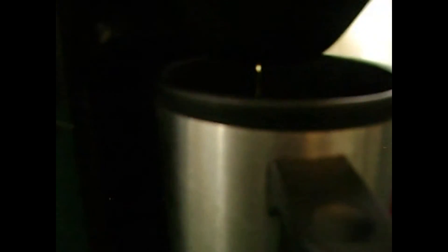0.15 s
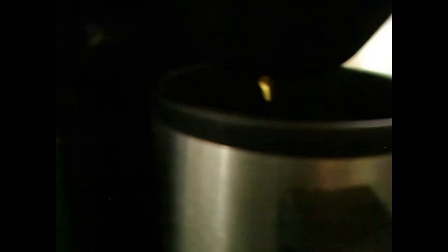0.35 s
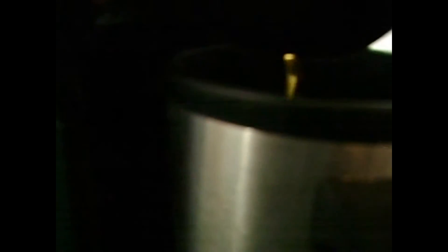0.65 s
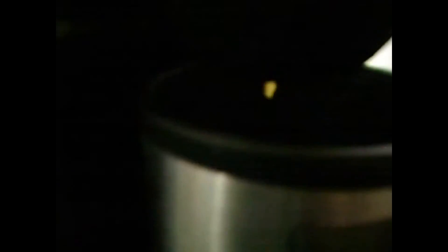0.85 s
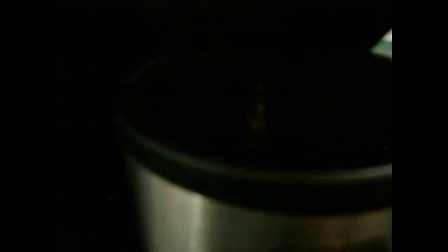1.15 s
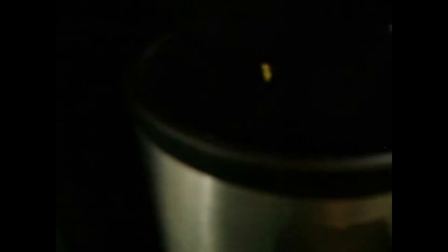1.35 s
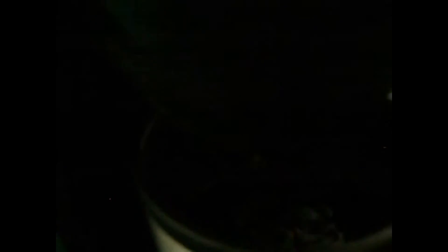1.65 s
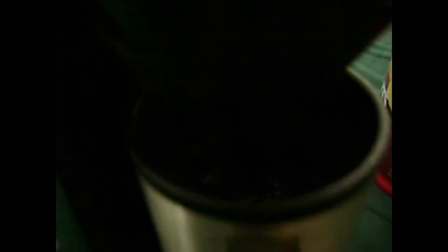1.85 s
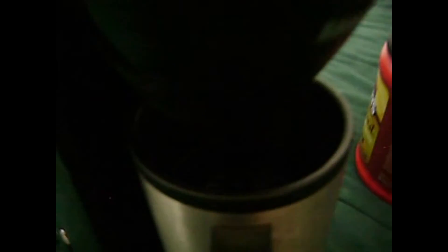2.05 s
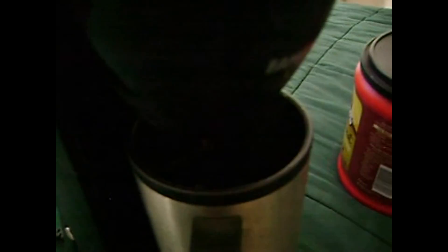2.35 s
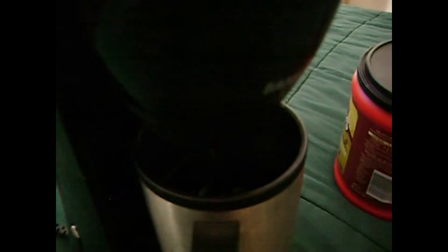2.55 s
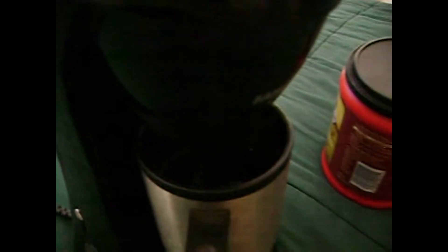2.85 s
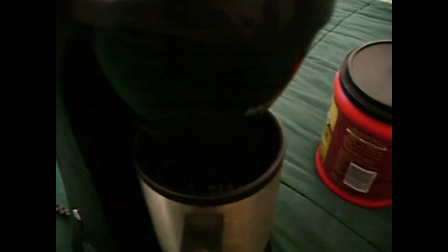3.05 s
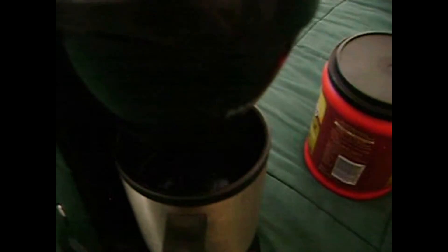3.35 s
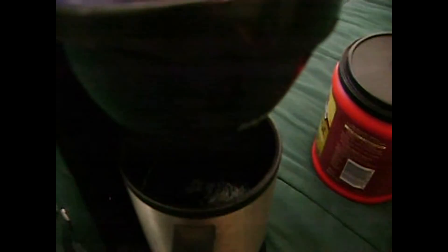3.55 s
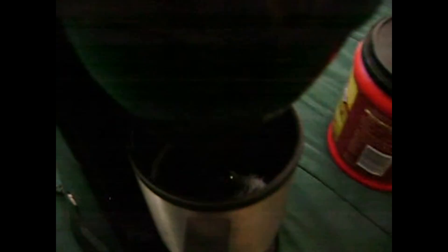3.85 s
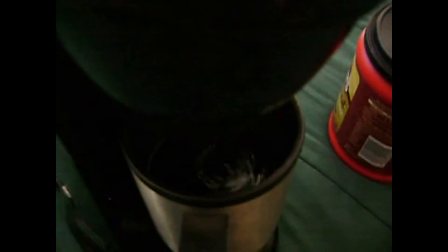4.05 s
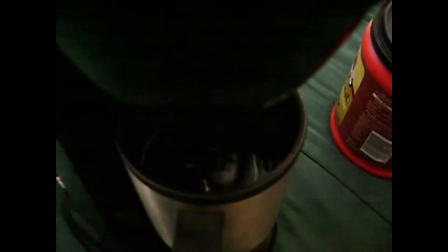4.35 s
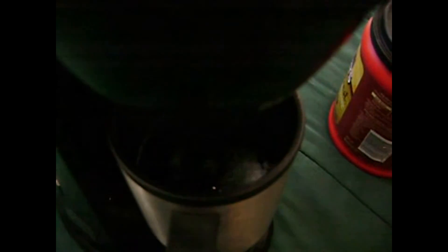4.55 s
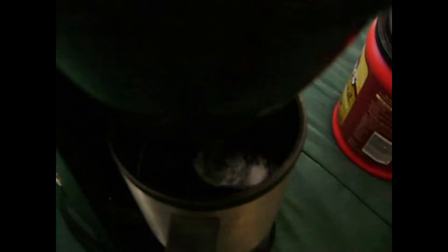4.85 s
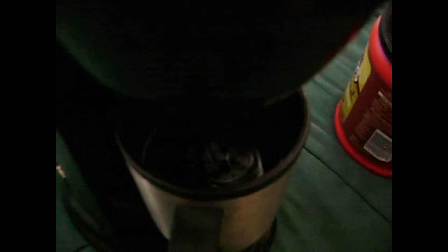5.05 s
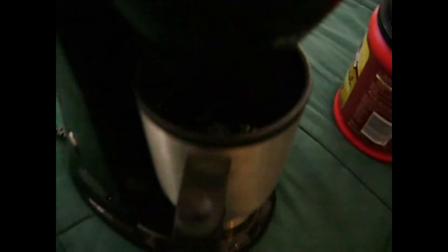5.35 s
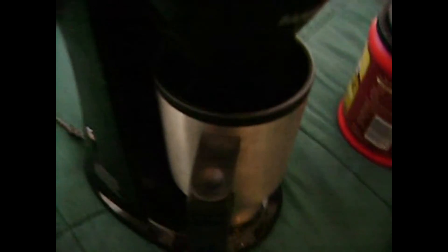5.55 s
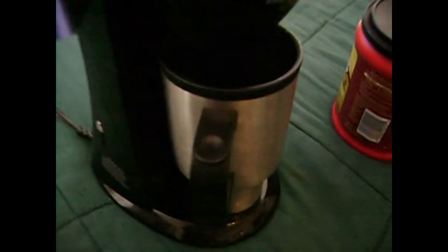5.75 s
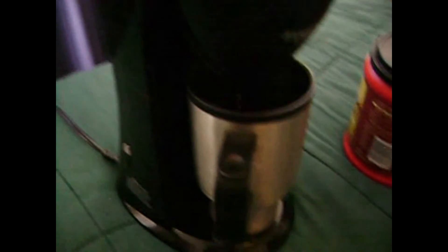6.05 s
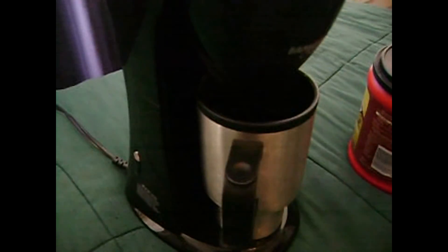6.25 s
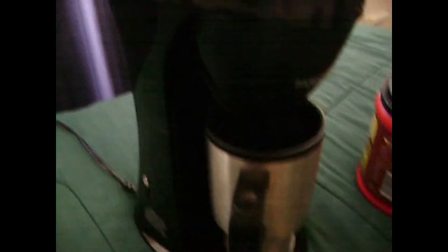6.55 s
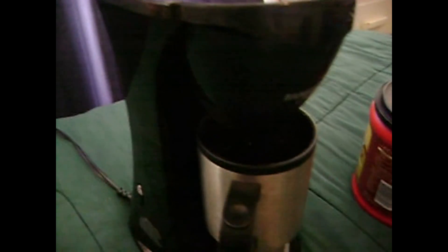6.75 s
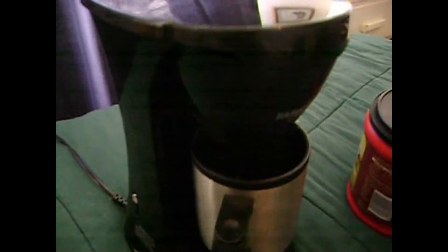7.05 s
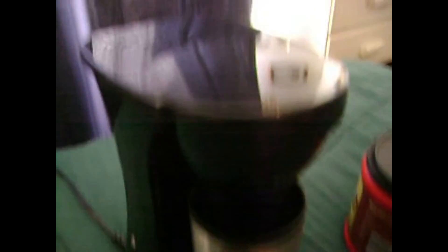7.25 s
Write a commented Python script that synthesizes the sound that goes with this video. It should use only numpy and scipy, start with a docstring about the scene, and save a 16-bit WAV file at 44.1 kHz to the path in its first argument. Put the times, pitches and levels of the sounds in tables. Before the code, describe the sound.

Hard knocking sputters from a coffee machine's basket crowd the first two seconds, with small bubbles and hissing spray between them. They weaken to occasional plops, leaving a faint, unsteady boil. Near the end the steam suddenly comes nearer, with crisp small pops. The sound is close, dull in the treble, gritty and overloaded, with only a short, dry room reflection.

```python
"""Slugs of water and steam pop out of the riser tube of a small drip coffee maker running dry in a bedroom.
Each pop is a double pressure push ringing the filter basket; its spray hisses and rings the lid.
Small bubbles burst between the pops, and three short blasts of steam rasp through the tube as gated noise.
Under them, flickering noise in fixed resonances makes the hum, gurgle, steam and simmer of the boil.
The close, narrow-band microphone kinks and overloads; near the end it rises over the open basket."""
import sys
import numpy as np
from scipy import signal
from scipy.io import wavfile
from scipy.ndimage import uniform_filter1d

SR = 44100
rng = np.random.default_rng(int(sys.argv[2]) if len(sys.argv) > 2 else 0)


def dump_mix(stems):
    """Bounce the given channels to the path in sys.argv[1] as a 16-bit WAV at rate SR."""
    frames = np.atleast_2d(stems).T  # one column per channel
    limited = np.clip(frames, -1, 1)  # hard clip at full scale
    pcm = np.round(limited * 32767).astype(np.int16)
    wavfile.write(sys.argv[1], SR, pcm)


N = 326781  # samples

# microphone path: low beside the mug, then lifted away, finally raised over the open basket
LIFT_START_S, LIFT_LENGTH_S = 0.84, 0.4
OPEN_START_S, OPEN_RISE_S, OPEN_CURVE = 6.74, 0.35, 1.33
OPEN_BOIL_LIFT_DB = 9  # the boil comes closer


def from_db(db):
    """Level definition: decibels to amplitude gain."""
    return 10 ** (np.asarray(db) / 20)


def rms_one(x):
    """Normalisation by effective value: scale to rms 1."""
    return x / np.sqrt(np.mean(x ** 2) + 1e-20)


def in_time(rows):
    """Linear interpolation: each column of a curve at every sample."""
    times, *columns = np.transpose(rows)
    t = np.arange(N) / SR
    return [np.interp(t, times, column) for column in columns]


def drift(rate_hz):
    """Low-passed random process: a slow fluctuation of spread 1."""
    step = 40  # samples between computed points
    pole = np.exp(-2 * np.pi * rate_hz * step / SR)
    settle = 2000  # points dropped while the filter settles
    noise = rng.standard_normal(N // step + settle + 2)
    slow = signal.lfilter([1], [1, -2 * pole, pole * pole], noise)[settle:]
    return np.interp(np.arange(N) / step, np.arange(len(slow)), rms_one(slow))


def resonate(x, modes, order=2):
    """Modal superposition: parallel resonances; order 2 has steeper sides and builds up more slowly."""
    out = 0
    for hz, width_hz, db in modes:
        low = np.hypot(hz, width_hz / 2) - width_hz / 2
        high = min(low + width_hz, SR / 2 - 1)
        band = signal.butter(order, [low, high], "band", fs=SR, output="sos")
        out = out + from_db(db) * signal.sosfilt(band, x + 1e-18)
    return out


def seething(modes, flicker_db, flicker_rate):
    """Random excitation of resonators: countless tiny collapses, in clumps, ring the modes; rms 1."""
    collapses = rng.standard_normal(N) * from_db(flicker_db * drift(flicker_rate))
    return rms_one(resonate(collapses, modes))


def add(track, s, sound):
    """Linear superposition: mix a sound into a track at a time."""
    start = max(round(s * SR), 0)
    track[start:start + len(sound)] += sound[:max(N - start, 0)]


def beside_mug(s):
    """Source-receiver position: 1 with the microphone low beside the mug, 0 once lifted away."""
    return 1 - np.clip((s - LIFT_START_S) / LIFT_LENGTH_S, 0, 1)


def openness(s):
    """Direct sound path: how directly the microphone faces the open basket, 0 to 1."""
    return np.clip((s - OPEN_START_S) / OPEN_RISE_S, 0, 1) ** OPEN_CURVE


# flow of steam through the basket before the microphone comes closer: (t/s, level/dB)
STEAM_FLOW = [(0.0, -40), (0.83, -39.5), (1.13, -37.5), (1.34, -30), (1.74, -39.5), (2.25, -44.5),
              (3.43, -51), (4.49, -48), (6.8, -55)]
# vigour of the simmer in the boiler, likewise: (t/s, level/dB)
SIMMER_VIGOUR = [(0.0, -47), (0.93, -51), (1.42, -43.5), (2.27, -48), (3.47, -48), (4.73, -45.5),
                 (5.4, -46), (6.19, -50), (6.8, -50.5)]


def vigour():
    """Source strength and distance: steam flow and simmer as they reach the microphone, in dB."""
    closer_db = OPEN_BOIL_LIFT_DB * openness(np.arange(N) / SR)
    return in_time(STEAM_FLOW)[0] + closer_db, in_time(SIMMER_VIGOUR)[0] + closer_db


# resonances of the boiler's hum: (f/Hz, width/Hz, relative level/dB)
HUM_MODES = [(45, 66, -12), (123, 75, -5.5), (211.6, 151, 2.5), (346, 140, -8.5)]
# resonances of water stirring in the basket: (f/Hz, width/Hz, relative level/dB)
GURGLE_MODES = [(526, 71, 2), (618.7, 121, 7.2)]
# resonances of steam stirring in the basket: (f/Hz, width/Hz, relative level/dB)
STEAM_MODES = [(968, 155, 11.5), (1164, 81, 11), (3900, 1600, -16)]
# resonances of the boiler's simmer: (f/Hz, width/Hz, relative level/dB)
SIMMER_MODES = [(1430, 420, -3), (1895, 323, 1.5), (3400, 2400, -12.5)]
# hum and gurgle follow the steam level by this share, the simmer level by the rest
HUM_STEAM_SHARE, GURGLE_STEAM_SHARE = 0.29, 0.35
MUG_SHADE_DB = -5  # the mug screens off the simmer


def boiling(hum_db=0.0, gurgle_db=4.0, steam_db=1.5, simmer_db=0.5):
    """Broadband excitation of modes: the boiler hums and simmers, water and steam stir in the basket."""
    t = np.arange(N) / SR
    steam, simmer = vigour()
    hum = simmer + HUM_STEAM_SHARE * (steam - simmer)
    hum = hum - OPEN_BOIL_LIFT_DB * openness(t)  # the hum is the same from above
    gurgle = simmer + GURGLE_STEAM_SHARE * (steam - simmer)
    shaded = simmer + MUG_SHADE_DB * beside_mug(t)
    out = from_db(hum + hum_db) * seething(HUM_MODES, flicker_db=1.4, flicker_rate=6.8)
    out += from_db(gurgle + gurgle_db) * seething(GURGLE_MODES, flicker_db=1.55, flicker_rate=14)
    out += from_db(steam + steam_db) * seething(STEAM_MODES, flicker_db=2.0, flicker_rate=65)
    out += from_db(shaded + simmer_db) * seething(SIMMER_MODES, flicker_db=2.5, flicker_rate=240)
    return out


def double_push(rebound_s=0.002014, rebound=1.19, jitter=0.11, soft_hz=1400):
    """Pressure-wave reflection: a slug bursts and its wave returns along the tube about 2 ms later."""
    push = signal.unit_impulse(SR // 20)
    delay_s = rebound_s * np.exp(jitter * rng.standard_normal())
    push[round(delay_s * SR)] += rebound * from_db(2.1 * rng.standard_normal())
    return signal.sosfilt(signal.butter(2, soft_hz, fs=SR, output="sos"), push)


# the basket's lower and upper rings: (f/Hz, width/Hz, relative level/dB)
BASKET_LOW = [(293, 117, -6), (540, 338, -5.5), (605.6, 58.4, 2.5)]
BASKET_UPPER = [(970, 139, -6), (1053, 95, -5.5)]
# the lid as struck by spray: (f/Hz, width/Hz, relative level/dB)
LID_RING = [(2030, 273, -18), (3740, 1630, -26.5)]
# the spray's own hiss: (f/Hz, width/Hz, relative level/dB)
SPRAY_HISS = [(2700, 1050, -26), (4400, 1100, -29)]


def pop(upper_db, lid_db, spread=0.02, spray_s=0.00071):
    """Impulse response: the push rings a slightly detuned basket and its spray strikes the lid; peak 1."""
    push = double_push()
    detune = np.exp(spread * rng.standard_normal())
    low_modes = [(hz * detune, width, db) for hz, width, db in BASKET_LOW]
    upper_modes = [(hz * detune, width, db) for hz, width, db in BASKET_UPPER]
    low = resonate(push, low_modes, order=1)
    upper = resonate(push, upper_modes, order=1)
    age = np.arange(len(push)) / SR / spray_s
    spray = rng.standard_normal(len(push)) * age ** 2 * np.exp(-age)
    spray = spray / np.linalg.norm(spray)
    lid = resonate(spray, LID_RING, order=1)
    hiss = resonate(spray, SPRAY_HISS)
    out = low - from_db(upper_db) * upper + from_db(lid_db) * lid + hiss
    return out / np.abs(out).max()


BUBBLES_PER_S, BUBBLE_OVER_STEAM_DB = 33, 9


def bubbles(size_spread_db=5.5, upper_db=-2, lid_db=4):
    """Poisson-like impulse train: small bubbles burst at random, larger when more steam flows."""
    steam_db, _ = vigour()
    born = rng.random(N) < BUBBLES_PER_S / SR
    scatter_db = size_spread_db * np.clip(rng.standard_normal(N), -2, 2)
    sizes = from_db(steam_db + BUBBLE_OVER_STEAM_DB + scatter_db)
    return signal.fftconvolve(born * sizes, pop(upper_db, lid_db))[:N]


# pops at the riser: (t/s, relative peak level/dB, hardness/dB)
POPS = [(0.0668, -12.5, 7), (0.158, -0.5, 8), (0.169, 4, 19), (0.2167, -8.5, 14.5), (0.2249, -10.5, 14.5),
        (0.268, -9.5, -6), (0.3135, -25.5, 9.5), (0.3425, -2.5, 12.5), (0.434, 4, 9), (0.4374, 2, 15.5),
        (0.447, -7.5, -10), (0.4624, -7, 20), (0.5103, -19.5, -4), (0.5934, 4, 12.5), (0.6034, -9, -12),
        (0.6186, -10.5, 17), (0.6578, -12.5, 14), (0.6712, -17.5, -1), (0.8486, 0, 4), (0.8709, -10.5, -13),
        (0.9166, -8, 9), (1.0353, -13.5, 17.5), (1.1258, -18, 17), (1.1353, -12, 1), (1.2005, -18, -15),
        (1.237, -6, 2), (1.2657, -10, -1), (1.3286, 3, 13), (1.3573, 6, 1), (1.3794, -2, 15),
        (1.4096, -14, 0), (1.6274, -9, 6.5), (1.6977, -16.5, 1), (1.711, -9, -16), (1.836, -7, 5),
        (1.8706, -8.5, 10), (1.9471, -15, 1.5), (2.143, -20.5, -4), (2.1947, -13, -6), (2.2556, -6.5, 2.5),
        (2.4063, -18.5, 6), (2.4467, -26.5, -10), (2.4785, -8, -3), (2.4834, -7.5, 2), (2.9269, -8, 11),
        (3.0939, -7, 5), (3.3185, -15.5, 5), (3.4901, -24.5, -19), (3.5857, -15, 5), (3.9345, -22, -12),
        (3.9854, -19.5, -12), (4.0384, -26, -9), (4.3654, -26, -15), (4.436, -28, 7), (4.5268, -15, -18),
        (6.95, -10.5, 19), (6.9826, -17, 13), (7.0039, -13.5, 6), (7.0184, -9, 12.5), (7.0615, -16, -1.5),
        (7.1014, -15.5, -3), (7.1247, -7, 5.5), (7.1845, -13.5, 9)]
UPPER_RING_DB, UPPER_PER_HARDNESS = 3, 0.45  # upper ring in a plain pop; dB more per dB of hardness
BESIDE_MUG_DB = 5.5  # the upper ring is stronger beside the mug


def pops(level_db=2.0, lid_db=-0.46, lid_from_above_db=6.0):
    """Excitation-dependent spectrum: hardness raises the upper ring and the lid; over the open basket the lid
    rings brighter."""
    out = np.zeros(N)
    for s, peak_db, hardness_db in POPS:
        upper_db = UPPER_RING_DB + UPPER_PER_HARDNESS * hardness_db
        upper_db += BESIDE_MUG_DB * beside_mug(s)
        struck_lid_db = lid_db + hardness_db + lid_from_above_db * (s > OPEN_START_S)
        add(out, s, from_db(peak_db + level_db) * pop(upper_db, struck_lid_db))
    return out


# rasping spurts of steam: (t/s, length/s, level/dB)
SPURTS = [(1.320, .011, -16), (1.362, .039, -12), (1.403, .011, -12)]
# what a spurt rings: (f/Hz, width/Hz, relative level/dB)
SPURT_MODES = [(81, 68, -3.5), (240, 230, -3.5), (492, 120, -2), (998, 310, 3.5), (1880, 160, -6),
               (3030, 1070, -12.5)]


def spurts():
    """Turbulent flow noise: steam tears through the last water in the tube in short rough blasts."""
    gate = np.zeros(N)
    for s, length_s, db in SPURTS:
        add(gate, s, from_db(db) * signal.windows.tukey(round(length_s * SR), .15))
    return gate * seething(SPURT_MODES, flicker_db=3.5, flicker_rate=300)


# steam heard directly from the open basket: (f/Hz, width/Hz, relative level/dB)
OPEN_MODES = [(500, 230, -3.5), (812, 280, 0.5), (1840, 260, -11.5), (4270, 1460, -21)]
OPEN_STEAM_DB = -31.5


def open_basket():
    """Direct radiation: from above, the steam is heard unobstructed over the wet grounds."""
    level = from_db(OPEN_STEAM_DB) * openness(np.arange(N) / SR)
    return level * seething(OPEN_MODES, flicker_db=3.5, flicker_rate=85)


def echoes(x, t60, first_s):
    """Exponential reverberant decay: dense reflections start after a short delay; unit energy."""
    t = np.arange(SR // 2) / SR
    onset = np.clip(t / first_s - 1, 0, 1)
    tail = rng.standard_normal(len(t)) * from_db(-60 * t / t60) * onset
    return signal.fftconvolve(x, tail / np.linalg.norm(tail))[:N]


def hollow(x, hz=760, width_hz=65):
    """Antiresonance: between the basket's two main resonances their sound cancels."""
    return signal.lfilter(*signal.iirnotch(hz, hz / width_hz, fs=SR), x)


ROOM_T60_S, ROOM_DB = 0.16, -23
BODY_T60_S, BODY_DB = 0.082, -22


def scene():
    """Direct plus reflected sound: sputter bounces round housing and soft room, over the boil."""
    sputter = pops() + bubbles() + spurts()
    housing = from_db(BODY_DB) * echoes(sputter, BODY_T60_S, first_s=0.0015)
    room = from_db(ROOM_DB) * echoes(sputter, ROOM_T60_S, first_s=0.0036)
    machine = hollow(sputter + housing + room + boiling())
    return (machine + open_basket())[None]


def kink(x, share, depth, window_s):
    """Crossover distortion: near zero, within a share of the local rms, gain falls (reverses if depth > 1)."""
    power = uniform_filter1d(x ** 2, max(round(window_s * SR), 2), axis=-1)
    near_zero = np.exp(-x ** 2 / (2 * share ** 2 * np.abs(power) + 1e-12))
    return x * (1 - depth * near_zero)


MIC_TOP_HZ, CUTOFF_HZ = 6000, 15900


def record(dry, overload=0.92, bass_cut_hz=15):
    """Nonlinear transduction and band-limiting: kinks, overload, little treble, converter limit, noise."""
    kinked = kink(dry, share=0.37, depth=1.47, window_s=0.0025)
    voiced = np.clip(kinked, -overload, overload)
    voiced = signal.sosfilt(signal.butter(1, bass_cut_hz, "high", fs=SR, output="sos"), voiced)
    narrow = signal.sosfilt(signal.butter(2, MIC_TOP_HZ, fs=SR, output="sos"), voiced)
    # steep treble edge: 60 dB down from 7480 Hz upwards
    narrow = signal.sosfilt(signal.cheby2(10, 60, 7480, fs=SR, output="sos"), narrow)
    limited = np.clip(narrow, -.97, .97) + from_db(-95) * rng.standard_normal(N)
    return signal.sosfilt(signal.ellip(10, .1, 80, CUTOFF_HZ, fs=SR, output="sos"), limited)


dry = scene()
out = record(dry)
dump_mix(out)
```